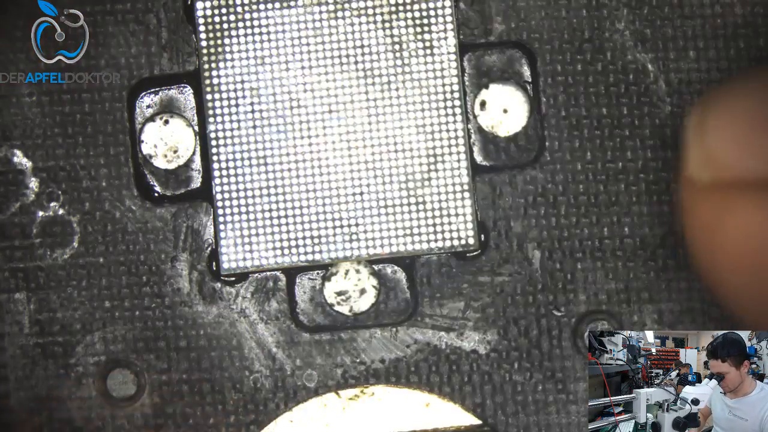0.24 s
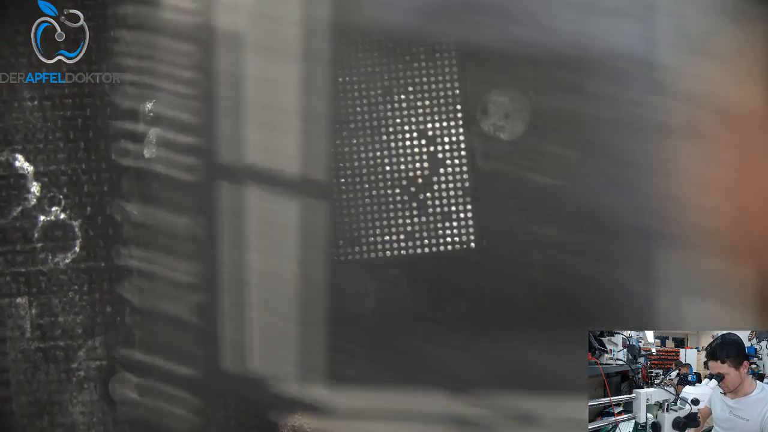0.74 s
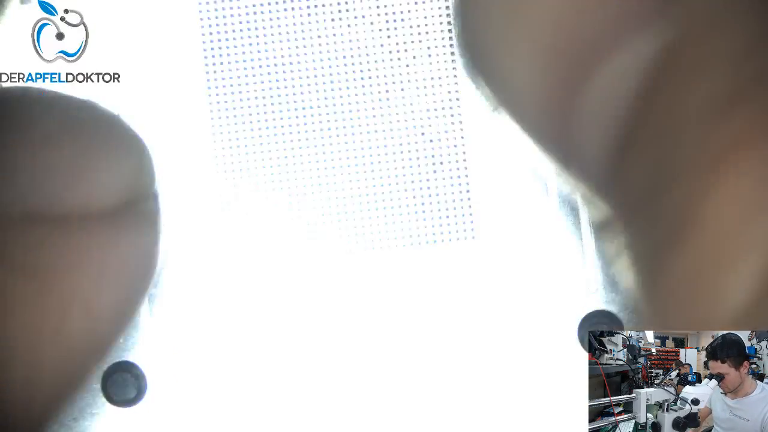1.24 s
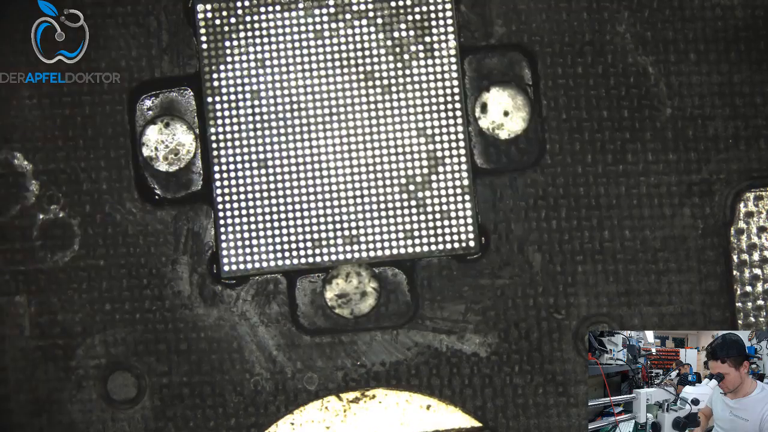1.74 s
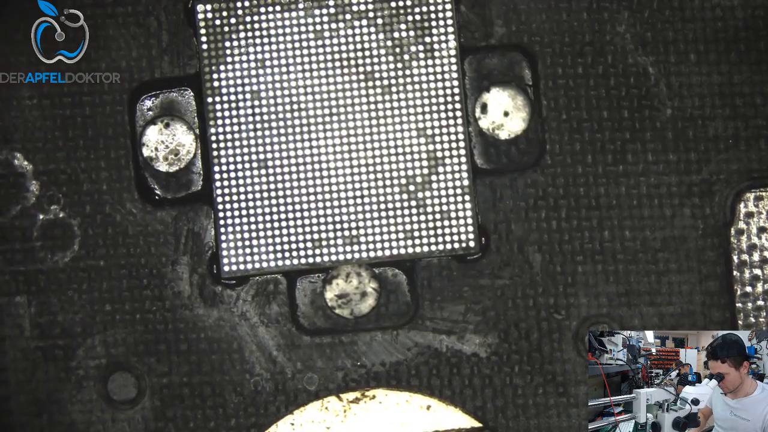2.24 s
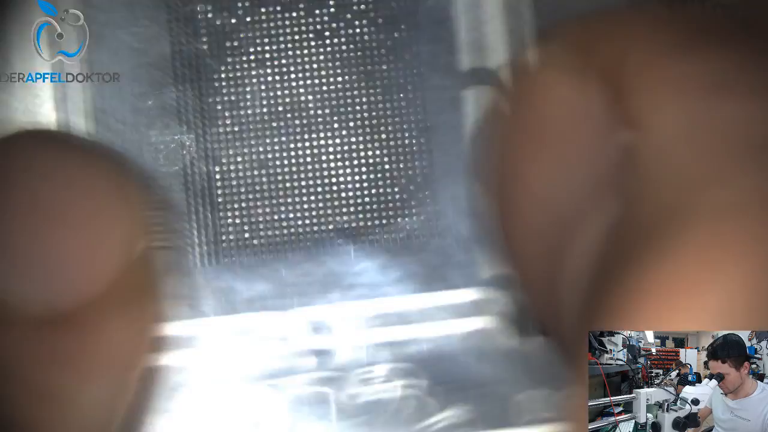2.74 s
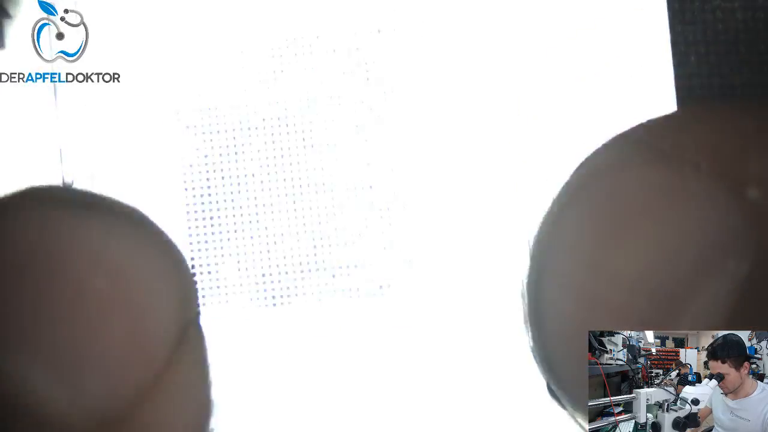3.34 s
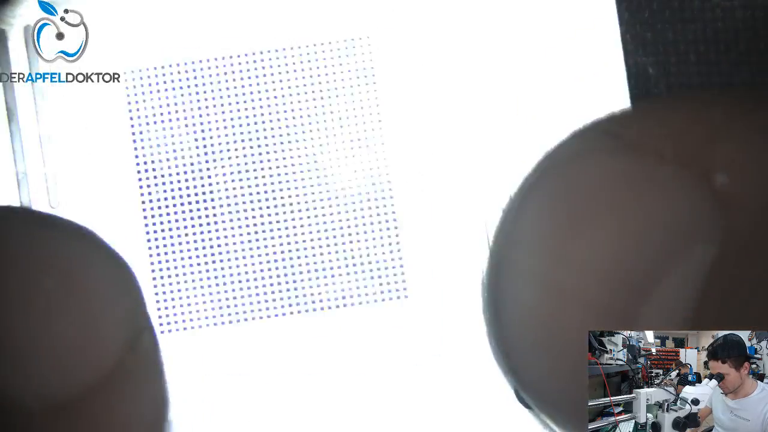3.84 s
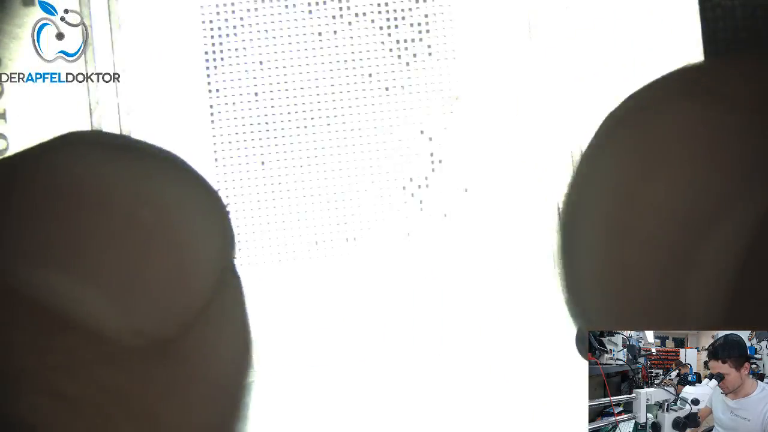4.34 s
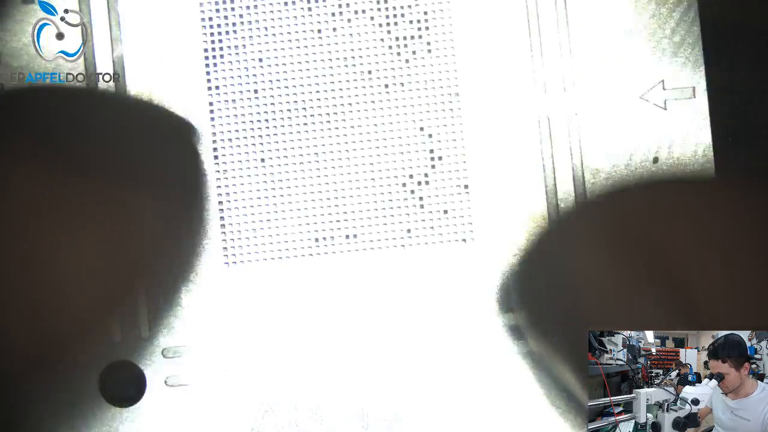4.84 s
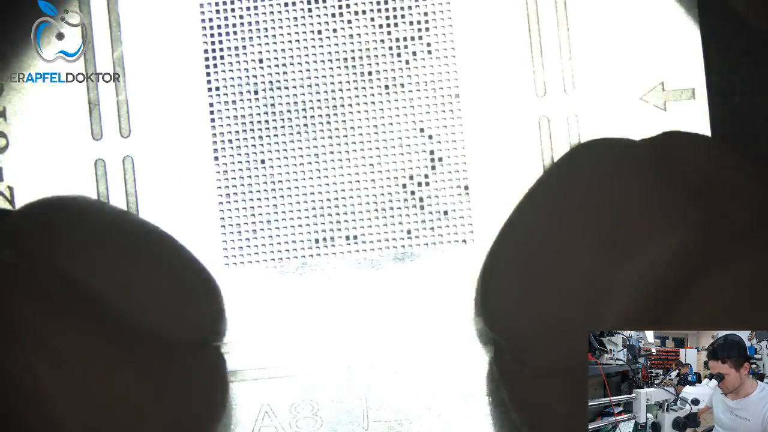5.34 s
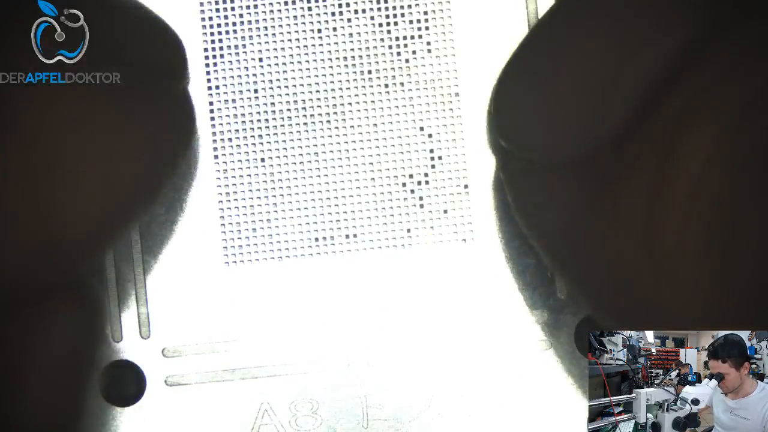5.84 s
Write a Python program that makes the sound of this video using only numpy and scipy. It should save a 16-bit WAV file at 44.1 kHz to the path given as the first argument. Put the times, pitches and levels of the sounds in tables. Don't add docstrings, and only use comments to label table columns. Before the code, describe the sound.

Last compressor strokes, a sharp fading release of air, then a quiet humming workshop with sparse metallic clicks, soft knocks and one bright snap.

```python
import sys
import numpy as np
from scipy import signal
from scipy.fft import rfft, irfft, next_fast_len
from scipy.io import wavfile
from scipy.ndimage import uniform_filter1d

SR = 44100
rng = np.random.default_rng(int(sys.argv[2]) if len(sys.argv) > 2 else 0)


def file_out(sig):
    cols = np.atleast_2d(sig).T
    lim = np.clip(cols, -1, 1)
    pcm = np.round(lim * 32767).astype(np.int16)
    wavfile.write(sys.argv[1], SR, pcm)


def voltage_ratio(decibels):
    exponent = np.asarray(decibels, float) / 20
    return 10 ** exponent


N = 267687
T = np.arange(N) / SR

# (pitch [Hz], width [Hz], level [dB])
CASING_TONES = [(148, 48, 18), (208, 56, 17), (330, 24, -3)]
# (frequency [Hz], level per Hz [dB])
CLATTER_SPECTRUM = [(180, -46), (300, -21), (836, -3.5), (909, -5), (1520, -13), (1940, -10), (5990, -20),
                    (9200, -10), (15600, -35)]
# (multiple of mains pitch, rms level [dB], phase [rad])
HUM_TONES = [(1, -57.3, -.15), (3, -70.8, 0)]
# (start [s], end [s])
LOADED_TIMES = [
    (1.62, 2.8),
    (4.32, 5.85),
]
# (pitch [Hz], width [Hz], rms level [dB])
FAN_TONES = [(115.4, 4.4, -77), (227, 6, -84), (276.3, 7.5, -81), (351.3, 2.6, -78.5), (2376, 28, -82)]
# (frequency [Hz], level per Hz [dB])
ROOM_AIR_SPECTRUM = [(120, -22), (200, -3), (283, -4), (471, -6), (691, -6.5), (785, -7.5), (1070, -8.5),
                     (3570, -16.5), (15600, -25)]
# (frequency [Hz], level per Hz [dB])
AMPLIFIER_SPECTRUM = [(20, 11), (90, 1), (300, -1), (1000, -6), (15000, -4.5)]
# (time [s],
# peak level [dB], pitch [Hz], # t60 [s], brightest frequency [Hz])
KNOCKS = [(.054, -37, 213, 0.075, 257), (0.948, -53, 890, .05, 2000), (1.082, -38, 1167, 0.057, 2180),
          (1.079, -46, 510, 0.096, 705), (1.112, -50.5, 916, 0.095, 990),
          (1.324, -44, 628, 0.079, 1670), (1.33, -45, 1000, 0.061, 1210),
          (1.358, -49, 617, 0.058, 1100), (1.68, -54, 915, 0.24, 2200),
          (1.888, -50.5, 1470, 0.21, 2860), (2.686, -47.5, 897, 0.14, 1570),
          (2.755, -53, 1170, 0.09, 1500), (2.781, -41, 843, 0.15, 1880), (2.782, -52, 330, 0.3, 447),
          (3.27, -58, 1310, 0.18, 3000), (4.286, -56, 1120, 0.11, 1620),
          (4.338, -44.5, 614, 0.059, 960), (4.342, -48, 1212, 0.13, 2300),
          (4.355, -52, 640, 0.096, 1090), (4.697, -58, 507, 0.05, 1800),
          (4.869, -57, 945, 0.16, 1500), (5.424, -54, 1150, 0.043, 1620),
          (5.875, -55.5, 1540, .025, 2800), (6.036, -51.5, 617, 0.082, 880)]
# (time [s], level [dB])
VENT_FLOW = [
    (.06, -25.5),
    (.14, -29.5),
    (.31, -35.5),
    (.35, -29),
    (.5, -32.5),
    (.9, -39.5),
    (1.15, -40),
    (1.45, -47),
    (2.2, -76),
]
# (frequency [Hz], level per Hz [dB])
JET_SPECTRUM = [(290, -66), (500, -28.5), (1150, -26), (1490, -18.5), (1940, -19.5), (4210, -2.5),
                (6130, -21), (6870, -4.5), (9040, -3.5), (11200, -0.5), (15600, -14.5)]
# (pitch [Hz], width [Hz], level [dB])
SHEET_TONES = [(2450, 170, -16), (3470, 780, 2.5), (4620, 170, 1), (5800, 240, -4), (8300, 140, 6),
               (10100, 520, 8.5), (11900, 1800, 0), (13000, 1300, -16)]
# (time [s], peak level [dB], ringing pitch [Hz], lower band level [dB])
SHEET_CLICKS = [(1.0845, -23, 8860, -16), (2.6794, -50, 8300, 0.5), (2.756, -42, 9260, -9),
                (4.046, -50, 10900, -10), (4.2857, -52, 4620, -9), (4.3214, -51, 10100, -16),
                (4.3316, -36.5, 10100, -13), (4.341, -29.5, 11700, -8), (4.6982, -51, 5800, -3),
                (4.8545, -55, 3550, 1.5), (5.21, -52, 10200, -11), (5.6017, -53, 10000, -18),
                (5.9713, -53, 10200, -21), (6.0361, -42.5, 8300, -12)]
# (time [s], peak level [dB], ringing pitch [Hz], lower band level
# [dB], t60 [s])
CLICKS_OWN_RING = [
    (1.325, -40, 5900, -3, .03),
    (2.222, -60, 3300, -5, .2),
    (2.221, -64.5, 4440, -3, 0.56),
    (2.757, -49, 5840, -14, .04),
    (4.3438, -37.5, 4620, -8, 0.039),
    (6.038, -42, 2520, -13, .02),
]
# (frequency [Hz], level per Hz [dB])
SNAP_SPECTRUM = [(88, -52), (150, -32), (814, -19), (969, -34), (1180, -24), (2280, -22), (4330, -8),
                 (4960, -13), (5360, -4), (6140, -13), (9060, -0.5), (11700, -4), (15600, -24)]
# (frequency [Hz], t60 [s])
ROOM_DECAY = [(200, 0.34), (1000, 0.48), (4000, 0.35), (10000, 0.35), (16000, 0.21)]
# (delay [s], level [dB])
WALL_ECHOES = [(0.011, -6), (.031, -20), (0.039, -12)]


def evened(x):
    return x / np.sqrt(np.mean(x ** 2) + 1e-20)


def read(points, hz):
    f, value = np.transpose(points)
    return np.interp(np.log(hz + 1), np.log(f + 1), value)


def add(mix, s, sound):
    part = mix[round(s * SR):][:len(sound)]
    part += sound[:len(part)]


def band(x, lo_hz, hi_hz):
    sos = signal.butter(N=2, Wn=[lo_hz, hi_hz], btype="band", fs=SR, output="sos")
    return signal.sosfilt(sos, x)


def coloured(points):
    size = next_fast_len(N)
    gain = voltage_ratio(read(points, np.fft.rfftfreq(size, 1 / SR)))
    return evened(irfft(rfft(rng.standard_normal(size)) * gain, size)[:N])


def resonate(x, hz, width):
    turn = np.exp(2j * np.pi * np.cumsum(hz * np.ones(len(x))) / SR)
    r = np.exp(-np.pi * width / SR)
    return 2 * (turn * signal.lfilter([1 - r], [1, -r], x / turn)).real


def whistle(noise, hz, width):
    return evened(resonate(resonate(noise, hz, width), hz, width))


def dying(db, hold_s, fall_db_per_s):
    return db - fall_db_per_s * np.maximum(T - hold_s, 0)


def bump(s, rise_s, fall_s):
    return np.exp(-((T - s) / np.where(T < s, rise_s, fall_s)) ** 2)


def drift(size):
    return evened(uniform_filter1d(uniform_filter1d(rng.standard_normal(N), size), size))


def pump():
    strokes_per_s, slowing_s = 44, 4.2
    turns = np.cumsum(strokes_per_s * np.exp(-T / slowing_s)) / SR
    stroke = 0.92 + np.exp(-(turns % 1) / 0.34)
    thump = np.sqrt(2) * np.sin(2 * np.pi * turns + 0.97)
    thump += 0.57 * evened(band(rng.standard_normal(N), 24, 89))
    shake = stroke * rng.standard_normal(N)
    rattle = sum(voltage_ratio(db) * resonate(shake, hz, width) for hz, width, db in CASING_TONES)
    rattle = evened(band(rattle, 84, 400))
    clatter = evened(stroke * coloured(CLATTER_SPECTRUM))
    thump_gain = voltage_ratio(dying(db=-44, hold_s=0.11, fall_db_per_s=66) - 4.5)
    rattle_gain = voltage_ratio(dying(db=-50, hold_s=0.076, fall_db_per_s=154))
    clatter_gain = voltage_ratio(dying(db=-43.5, hold_s=0.031, fall_db_per_s=127))
    return thump_gain * thump + rattle_gain * rattle + clatter_gain * clatter


def background():
    mains_hz = 50.0145
    hum = sum(np.sqrt(2) * voltage_ratio(db) * np.cos(2 * np.pi * k * mains_hz * T + phase)
              for k, db, phase in HUM_TONES)
    noise = rng.standard_normal(N)
    loaded = sum((T > start) & (T < end) for start, end in LOADED_TIMES)
    buzz_db = -79 + 10.5 * loaded + 3.5 * drift(size=3500)
    buzz_hz = 99 + 2.38 * evened(uniform_filter1d(noise, 5000))
    buzz = voltage_ratio(buzz_db) * np.sqrt(2) * np.sin(2 * np.pi * np.cumsum(buzz_hz) / SR)
    buzz = buzz * voltage_ratio(1.2 * evened(uniform_filter1d(noise[::-1], 2500)))
    fan = sum(voltage_ratio(db) * evened(resonate(noise, hz, width)) for hz, width, db in FAN_TONES)
    rumble = voltage_ratio(-66 + 5 * drift(size=6000)) * evened(band(band(noise, 15, 26.2), 8.5, 36))
    wash = voltage_ratio(-74) * evened(band(rng.standard_normal(N), 40, 215))
    swell = voltage_ratio(0.5 * evened(uniform_filter1d(rng.standard_normal(N), 6000)))
    air = voltage_ratio(-66) * swell * coloured(ROOM_AIR_SPECTRUM)
    return hum + buzz + fan + rumble + wash + air


def knock(db, hz, t60, top_hz):
    t = np.arange(6000) / SR
    a, b = rng.standard_normal((2, len(t)))
    fade = voltage_ratio(-60 * t / t60) * np.minimum(t / 0.003, 1)
    thud = (fade + 1.4 * np.exp(-t / 0.013)) * a
    thud = band(band(thud, 0.5 * hz, top_hz), 0.5 * hz, top_hz)
    ring = fade * (np.sin(2 * np.pi * hz * t) + 0.5 * whistle(b, hz, 100))
    share = np.clip(0.1 + (hz / top_hz) ** 3, 0, 1)
    sound = np.sqrt(1 - share) * evened(thud) + np.sqrt(share) * evened(ring)
    return voltage_ratio(db) * sound / abs(sound).max()


def vent():
    settled = 1 - np.exp(-T / 1)
    gasp = T > 2.222
    surge = bump(s=0.34, rise_s=0.04, fall_s=0.1)
    late = bump(s=0.40, rise_s=0.045, fall_s=0.045)
    flow_db = np.interp(T, *np.transpose(VENT_FLOW))
    high_db = np.where(gasp, dying(db=-66, hold_s=2.222, fall_db_per_s=147), flow_db)
    low_db = high_db - 13.5 + 11.5 * settled + 5 * late
    high_hz = (9280 + 77 * T - 1150 * surge) * (1 - 0.13 * gasp)
    low_hz = 4540 - 240 * settled + 220 * late

    sharp = 0.079 + (0.45 - 0.079) * settled + 0.74 * np.maximum(surge, late)
    sharp = np.clip(sharp, 0, 1)
    broad_gain, sharp_gain = np.sqrt(1 - sharp), np.sqrt(sharp)
    flutter = voltage_ratio(0.65 * evened(uniform_filter1d(rng.standard_normal(N), 300)))
    a, b, c, d = rng.standard_normal((4, N))
    high = broad_gain * whistle(a, high_hz, 4380) + sharp_gain * whistle(b, high_hz, 1600)
    low = broad_gain * whistle(c, low_hz - 150, 1800) + sharp_gain * whistle(d, low_hz, 1030)
    whistles = band(voltage_ratio(high_db) * high + voltage_ratio(low_db) * low, 2110, 12700)
    jet = voltage_ratio(dying(db=-36.5, hold_s=0.55, fall_db_per_s=32.5)) * coloured(JET_SPECTRUM)
    opening = np.clip((T - 0.057) / 0.0096, 0, 1) ** 0.42
    return (whistles + jet) * flutter * opening


def click(db, hz, low_db, t60=0.025):
    t = np.arange(5000) / SR
    scrape_ms = 1.0 + 8 * t60
    u = t / (scrape_ms / 1000)
    scrape = u * np.exp(-u * 1.42) * rng.standard_normal(len(t))
    sheet = 0
    for f, width, tone_db in SHEET_TONES:
        lift_db = low_db + 11 if f < 6500 else 0
        sheet = sheet + voltage_ratio(tone_db + lift_db) * evened(resonate(scrape, f, width))
    sheet = evened(band(band(sheet, 1400, 15000), 1400, 15000))
    ring = voltage_ratio(-60 * t / t60) * np.sin(2 * np.pi * hz * t)
    ring = evened(signal.fftconvolve(scrape, ring)[:len(t)])
    sound = sheet + (0.5 + 8 * t60) * ring
    return voltage_ratio(db) * sound / abs(sound).max()


def snap():
    peak_s, rise_s = 2.784, 0.0057
    slope_db_per_s = np.where(T < peak_s, 2800, 1350)
    level_db = -27 - slope_db_per_s * abs(T - peak_s)
    return voltage_ratio(level_db) * (T > peak_s - rise_s) * coloured(SNAP_SPECTRUM)


def shop(x, wet_db):
    taps = np.zeros(SR // 2)
    at = np.arange(300, len(taps) - 20, 20)
    taps[at + rng.integers(0, 20, len(at))] = rng.choice([-1., 1.], len(at))
    hz, t, z = signal.stft(taps, SR, nperseg=256)
    fade = voltage_ratio(-60 * t / read(ROOM_DECAY, hz)[:, None])
    tail = signal.istft(z * fade, SR, nperseg=256)[1]
    tail = tail / np.linalg.norm(tail)
    for delay, db in WALL_ECHOES:
        tail[round(delay * SR)] += voltage_ratio(db)
    return x + voltage_ratio(wet_db) * signal.fftconvolve(x, tail)[:N]


def scene():
    bench = snap()
    for s, *row in SHEET_CLICKS + CLICKS_OWN_RING:
        add(bench, s, click(*row))
    for s, *row in KNOCKS:
        add(bench, s, knock(*row))
    hiss = voltage_ratio(-4.5) * shop(vent(), wet_db=0.9)
    mono = hiss + pump() + shop(bench, wet_db=-14.5) + background()
    return np.array([mono, mono])


def roll_off(x):
    return signal.sosfilt(signal.butter(12, 15770, fs=SR, output="sos"), x)


def record(dry):
    hiss = np.array([coloured(AMPLIFIER_SPECTRUM), coloured(AMPLIFIER_SPECTRUM)])
    noisy = dry + voltage_ratio(-66) * hiss
    edge = signal.firwin(511, 15720, window=("kaiser", 8), fs=SR)
    mix = signal.oaconvolve(noisy, edge[None], "same")
    return roll_off(mix)


dry = scene()
out = record(dry)
file_out(out)
```